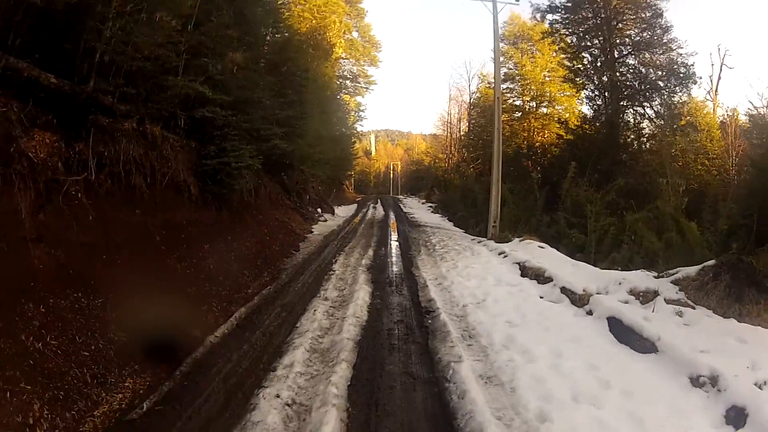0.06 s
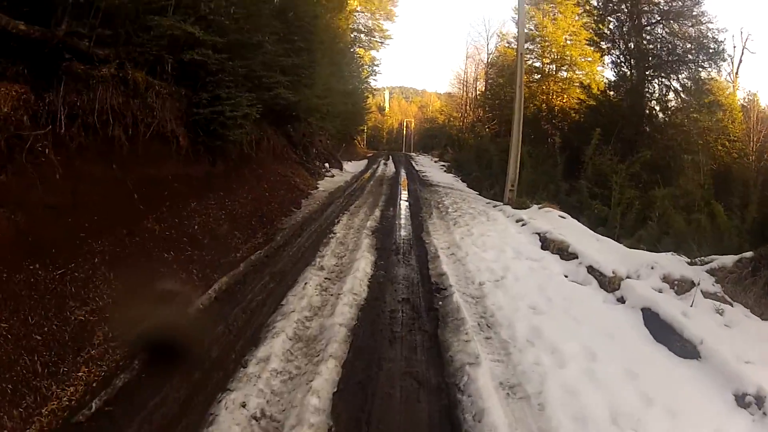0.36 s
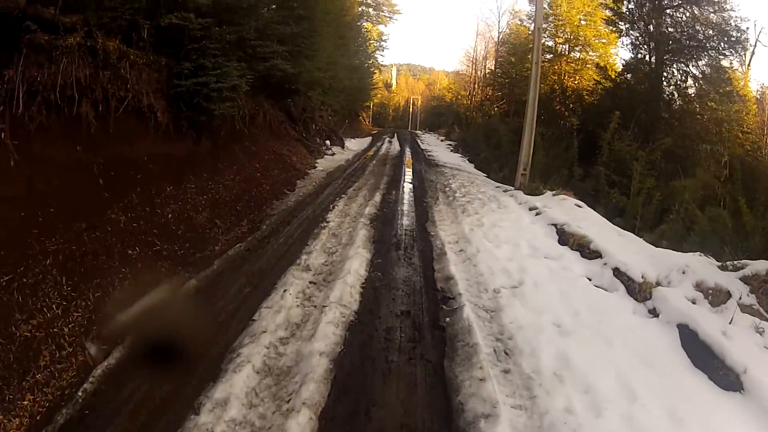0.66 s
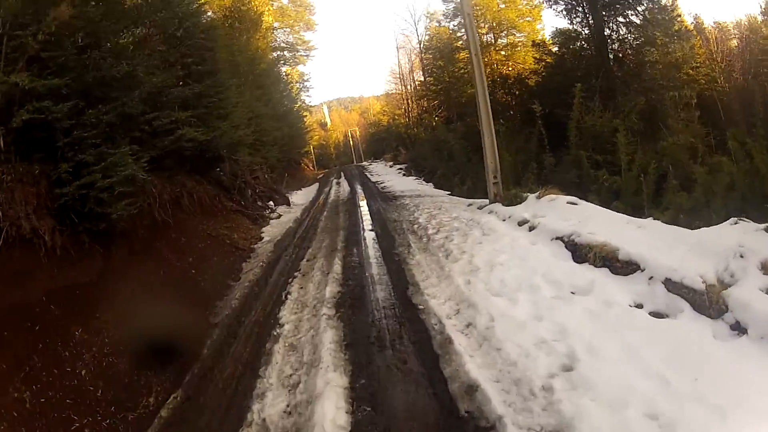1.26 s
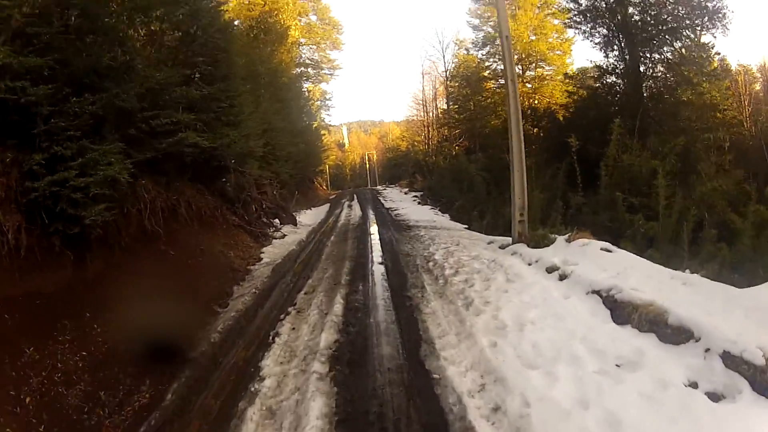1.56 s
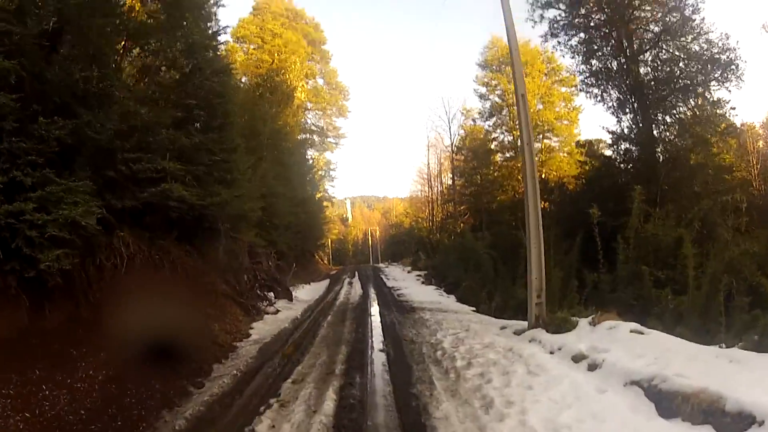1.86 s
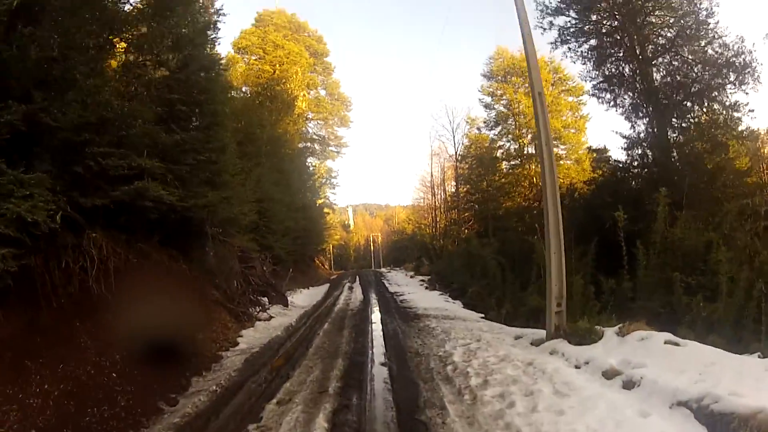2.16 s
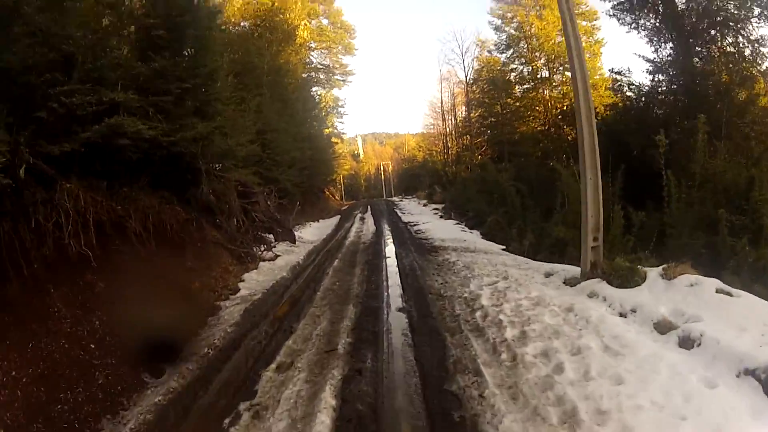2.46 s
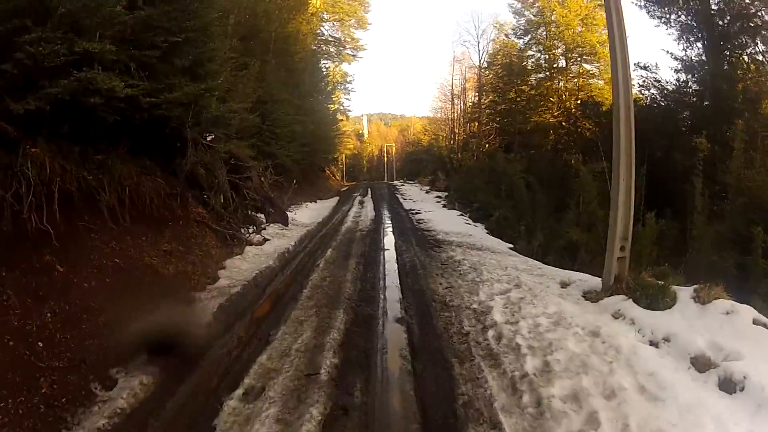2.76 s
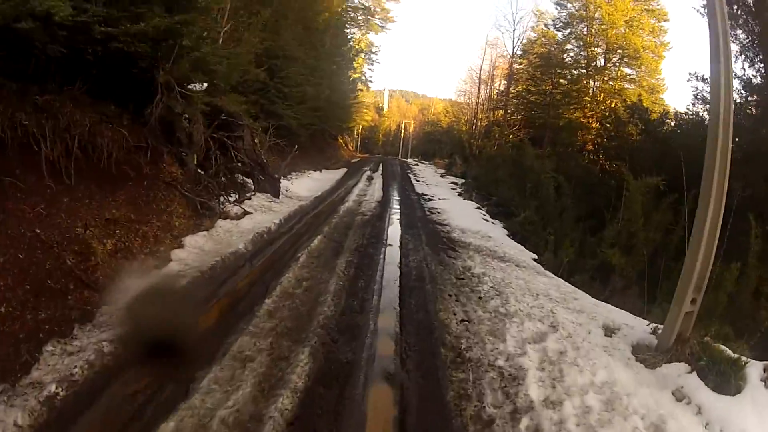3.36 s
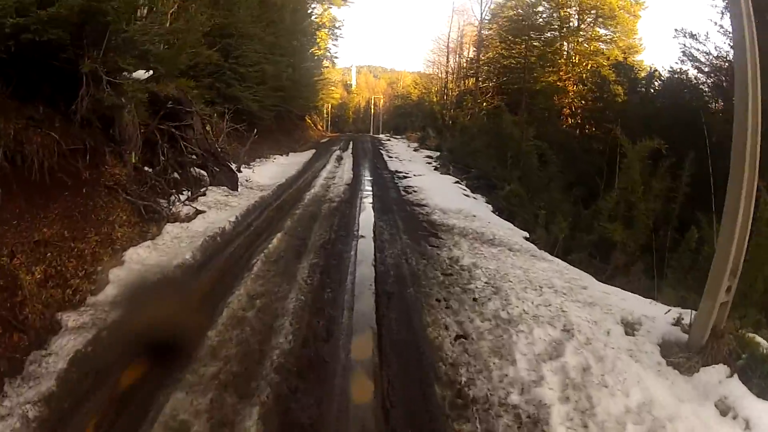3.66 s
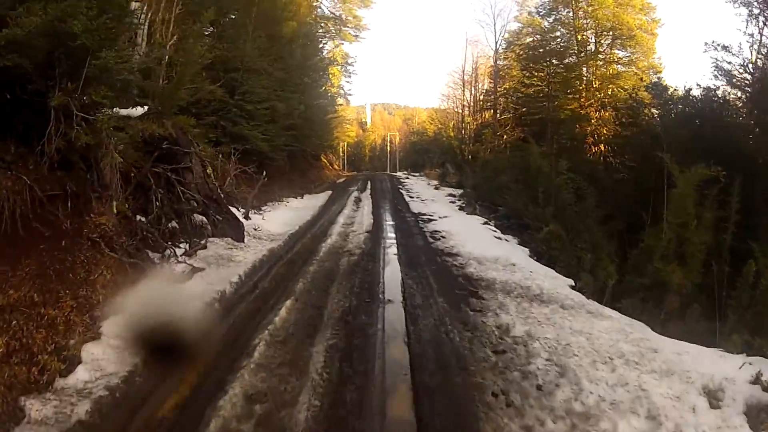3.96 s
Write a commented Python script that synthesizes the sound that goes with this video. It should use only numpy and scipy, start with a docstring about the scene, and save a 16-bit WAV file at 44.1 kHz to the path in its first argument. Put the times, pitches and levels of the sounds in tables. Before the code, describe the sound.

Wet slush hisses and spatters under bicycle tyres on a forest road, growing a little stronger midway. Deep wind buffeting, soft knocks and scattered rattling clicks run through it, heard close and boxy from a microphone travelling with the bike.

```python
"""Bicycle on a slushy forest track

Heard from a closed case that rides along. The tyres throw a fizzing spray and splash through wetter
patches, both coloured by the case's resonances. Grit or rattle ticks on the case, bumps rock the
mount and wind buffets it, over a bed of tyre roar and hiss."""
import sys
import numpy as np
from scipy import signal
from scipy.fft import rfft, irfft
from scipy.io import wavfile
from scipy.ndimage import uniform_filter1d

SR = 44100
rng = np.random.default_rng(int(sys.argv[2]) if len(sys.argv) > 2 else 0)


def log_audio(samples):
    """Write samples as a 16-bit WAV file to the path given in sys.argv[1]."""
    # one column per channel
    frames = np.atleast_2d(samples).T
    # limit to full scale, then quantise
    limited = np.clip(frames, -1, 1)
    pcm = np.round(limited * 32767).astype(np.int16)
    wavfile.write(sys.argv[1], SR, pcm)


N = 176400
TIME = np.arange(N) / SR

# Fader ride of the tyre spray. Each row: time in seconds, relative level in dB.
SPRAY_RIDE = [(0, -62), (.24, -61.5), (.45, -62), (.58, -64.5), (.64, -60), (.9, -61), (1.3, -61.5),
              (1.62, -57.5), (1.75, -60), (1.96, -57.5), (2.1, -59), (2.22, -55.5), (2.43, -57.5),
              (2.6, -57), (2.77, -59.5), (2.88, -57.5), (3.17, -58), (3.3, -60), (3.4, -67), (3.7, -64.5),
              (4, -60.5)]
# Resonances of the closed case. Each row: frequency in Hz, relative gain in dB.
CASE_EQ = [(200, -31.5), (600, -19.5), (950, -11.5), (1200, -2.5), (1400, -10), (1600, -11), (1820, 2.5),
           (2020, -3.5), (2170, -2), (2500, -1.5), (2930, -3.5), (3130, -1.5), (3400, -8), (3680, -4),
           (3980, -13), (4500, -13), (5130, -14.5), (5600, -18), (6020, -34), (6450, -18.5), (6900, -17),
           (7500, -18.5), (8000, -17), (8350, -11.5), (8600, -12), (9500, -12), (10250, -14), (10550, -29),
           (10850, -21.5), (11300, -41), (12800, -38), (13200, -28), (13500, -25), (13850, -15),
           (15200, -14.5)]
# Slush splashes. Each row: start in seconds, relative level in dB, fade in seconds, resonance in Hz.
SPLASH_CUES = [(0.212, -49.5, 0.011, 2400), (0.523, -52.5, 0.024, 2000), (0.753, -56, .025, 1870),
               (1.042, -49.5, 0.0067, 3220), (1.829, -55, 0.004, 6500), (1.855, -52.5, .014, 2500),
               (1.993, -49.5, 0.0098, 1310), (2.154, -48.5, 0.0081, 2300), (2.197, -45, 0.0051, 2300),
               (2.236, -55, .025, 2400), (2.5545, -40, 0.011, 1880), (2.573, -48, 0.005, 1900),
               (2.603, -59, .004, 5000), (2.627, -50, 0.01, 1820), (2.835, -51, 0.0079, 2200),
               (2.895, -50.5, 0.014, 2470), (3.13, -56, 0.02, 2500), (3.23, -57, 0.011, 2570),
               (3.952, -49, 0.0025, 3040)]
# Hard ticks, some in bouncing clusters. Each row: start in seconds, relative level in dB.
TICK_CUES = [(.3065, -49.5), (.3118, -52), (.3135, -56), (.3678, -57), (.852, -70), (.8668, -52),
             (.8941, -52), (.8986, -62), (.908, -56), (1.0417, -55), (1.5558, -51), (1.5885, -52),
             (1.6932, -49), (1.6957, -45.5), (1.7018, -48), (1.8295, -58), (1.9088, -55), (2.1262, -44),
             (2.1328, -45.5), (2.2969, -54), (2.3086, -53), (2.3152, -46.5), (2.3174, -49), (2.4432, -50.5),
             (2.5735, -51), (2.6058, -51), (3.2856, -60), (3.298, -55.5), (3.6468, -56), (3.8762, -42),
             (3.9167, -53.5)]
# The ring of a tick, two peaks round a notch. Each row: frequency in Hz, relative gain in dB.
TICK_EQ = [(1000, -25), (4000, -16), (4500, -20), (4750, 2), (5150, 4), (5600, -5.5), (6000, -19),
           (6450, -5), (6900, 1), (7300, -2), (7520, -27), (10000, -22), (15000, -42)]
# Bumps in the track. Each row: start in seconds, relative level in dB, rocking in Hz, decay in seconds.
BUMP_CUES = [(.35, -35.5, 29.5, 0.053), (0.594, -33.5, 30.3, 0.015), (.68, -37, 29.6, 0.0077),
             (0.838, -29.5, 30.9, 0.095), (1.311, -40, 31, 0.027), (1.627, -33.5, 27.3, 0.0083),
             (2.002, -28.5, 27.4, 0.0054), (2.28, -32, 25, 0.052), (2.555, -28, 28.5, 0.063),
             (2.999, -36, 32.4, .05), (3.11, -31, 36.4, 0.013), (3.169, -32, 26.6, 0.031),
             (3.848, -37.5, 29.2, 0.13)]
# The dull body of a bump. Each row: frequency in Hz, relative gain in dB.
THUD_EQ = [(30, -9.5), (70, 2.5), (120, -5), (250, -12.5), (500, -29), (2000, -58)]
# Fader ride of the wind. Each row: time in seconds, relative level in dB.
WIND_RIDE = [(0, -44.5), (.22, -44.5), (.5, -47), (.75, -43), (.95, -41.5), (1.1, -45.5), (1.25, -46),
             (1.35, -47.5), (1.5, -46.5), (1.75, -46), (1.95, -42.5), (2.08, -46.5), (2.25, -50.5),
             (2.4, -46), (2.7, -46.5), (3.0, -45.5), (3.28, -41.5), (3.38, -55.5), (3.5, -41.5),
             (3.78, -54.5), (4, -40)]
# Sub-heavy wind on the case. Each row: frequency in Hz, relative gain in dB.
WIND_EQ = [(8, -15), (20, 0), (30, 0), (42, -7), (60, -10), (85, -26.5), (130, -28), (300, -57),
           (1000, -82)]
# Low roar of the rolling tyres. Each row: frequency in Hz, relative gain in dB.
ROAR_EQ = [(30, -7), (100, 0), (170, 0), (250, 0.5), (400, -5.5), (700, -12), (1100, -18), (2500, -18.5),
           (8000, -78)]
# Hiss of air and far tyre noise. Each row: frequency in Hz, relative gain in dB.
HISS_EQ = [(500, -11), (1200, -10.5), (1500, -6.5), (1830, 9), (2200, -21.5), (3600, 5), (4100, -13),
           (5200, -21.5), (6000, -25), (6900, -12.5), (9500, -19.5), (12000, -16), (15000, -17.5)]
# Faint noise that widens the stereo image. Each row: frequency in Hz, relative gain in dB.
WIDTH_EQ = [(24, -51), (40, -32), (102, -4.5), (251, 4), (1500, -13), (1790, -44.5), (4650, -9),
            (6240, -28), (7220, -13.5), (8790, -31.5), (14000, -49)]


def spray():
    """Water and slush leave the tyres in a fluttering stream, heard through the case."""
    level = curve(SPRAY_RIDE) * amp(-0.5 + 0.56 * wander(3.5, 60))
    return colour(patchy(droplets(), depth_db=1.0) * level * clumps(), CASE_EQ)


def droplets(per_second=6000, spread_db=2.5, wash_share=0.49):
    """Dense tiny impacts of uneven size fizz over a smooth wash."""
    size = amp(spread_db * np.minimum(rng.exponential(1, N), 5))
    hits = size * rng.choice([-1, 1], N) * (rng.random(N) < per_second / SR)
    return np.sqrt(1 - wash_share) * unit(hits) + np.sqrt(wash_share) * rng.standard_normal(N)


def clumps(per_second=90, decay_s=0.0027, spread_db=3):
    """Gain on the spray: it leaps as each clump of slush bursts, then falls back."""
    power = amp(spread_db * np.minimum(rng.exponential(1, N), 2)) ** 2
    bursts = power * (rng.random(N) < per_second / SR)
    return np.sqrt(1 + signal.lfilter([1], [1, -np.exp(-1 / (decay_s * SR))], bursts))


def sizzle(ring_hz=2445, q=6.1):
    """Droplets ring the wet tyre, which sings out where the spray is strongest."""
    ride = curve(SPRAY_RIDE)
    level = amp(-63 + 2.5 * wander(3.5, 30)) * (ride / ride.max()) ** 2.75
    peak = signal.iirpeak(ring_hz, q, fs=SR)
    return level * unit(signal.lfilter(*peak, signal.lfilter(*peak, droplets())))


def splashes(attack_s=0.0005, crack_db=19, q=8.4, wet_gain=2.7):
    """Each wetter patch gives a crack and a short burst of droplets with a wet resonance."""
    track, drops, t = np.zeros(N), droplets(), TIME[:SR // 8]
    for k, (start, db, fade_s, hz) in enumerate(SPLASH_CUES):
        envelope = np.minimum(t / attack_s, 1) * np.exp(-(t / fade_s) ** 2 / 2)
        burst = envelope * drops[k * len(t):][:len(t)] + amp(crack_db) * (t == 0)
        wet = signal.lfilter(*signal.iirpeak(hz, q, fs=SR), burst)
        add(track, start, amp(db) * (burst + wet_gain * wet) / np.hypot(1, wet_gain))
    return colour(track, CASE_EQ)


def ticks(strays_per_second=14, tail_s=0.0034, tail_db=-6.5):
    """Hard impacts ring the case: faint random strays, and cued hits with a rattling tail."""
    hits = amp(-73 + 5.5 * rng.standard_normal(N)) * (rng.random(N) < strays_per_second / SR)
    t = TIME[:SR // 40]
    for start, db in TICK_CUES:
        tail = rng.standard_normal(len(t)) * np.exp(-t / tail_s) * np.minimum(2 * t / tail_s, 1)
        add(hits, start, amp(db) * ((t == 0) + amp(tail_db) * tail / np.linalg.norm(tail)))
    return amp(14.5) * colour(hits, TICK_EQ)


def bumps(attack_s=0.0085, overtone_db=-25.5):
    """Each bump rocks the mount in a dying low wobble and swells the tyre roar."""
    rocking, swell, t = np.zeros(N), np.zeros(N), TIME[:SR // 2]
    for start, db, hz, decay_s in BUMP_CUES:
        envelope = np.minimum(t / attack_s, 1) * np.exp(-np.maximum(t - 3 * attack_s, 0) / decay_s)
        phase = 2 * np.pi * hz * t
        wobble = np.sin(phase) + amp(overtone_db) * envelope * np.sin(2 * phase)
        add(rocking, start, amp(db) * envelope * wobble)
        add(swell, start, amp(db) * envelope ** 2)
    return rocking + amp(-34) * swell * noise(ROAR_EQ)


def thuds(delay_s=0.017, width_s=0.016):
    """A short dull knock as each bump reaches the case."""
    level = sum(amp(db) * np.exp(-((TIME - start - delay_s) / width_s) ** 2)
                for start, db, _, _ in BUMP_CUES)
    return amp(-21) * level * noise(THUD_EQ)


def wind():
    """Gusts buffet the case with a deep rumble."""
    return amp(-0.5) * curve(WIND_RIDE) * noise(WIND_EQ)


def tyre_roar():
    """The rolling tyres lay down a low, barely wavering bed."""
    return amp(-63.5 + 0.31 * wander(1, 16)) * noise(ROAR_EQ)


def hiss():
    """Air and far tyre noise blend into a steady hiss."""
    return amp(-72.5) * noise(HISS_EQ)


def amp(db):
    """Decibels to gain."""
    return 10 ** (np.asarray(db) / 20)


def unit(x):
    """Scales to rms 1."""
    return x / np.sqrt(np.mean(x ** 2) + 1e-20)


def curve(ride):
    """Gain over time from a fader ride."""
    return amp(np.interp(TIME, *np.transpose(ride)))


def add(track, start_s, sound):
    """Mixes a sound in at its cue."""
    part = track[max(round(start_s * SR), 0):][:len(sound)]
    part += sound[:len(part)]


def colour(x, eq):
    """Minimum-phase EQ of unit energy: the ring follows the hit."""
    eq_hz, eq_db = np.transpose(eq)
    hz = abs(np.fft.fftfreq(16384, 1 / SR))
    log_gain = np.log(amp(np.interp(np.log(hz + 1), np.log(eq_hz + 1), eq_db)))
    taps = np.fft.ifft(np.exp(np.conj(signal.hilbert(log_gain)))).real[:len(hz) // 2]
    return signal.fftconvolve(x, taps / np.linalg.norm(taps))[:N]


def noise(eq):
    """Noise of rms 1, shaped by an EQ."""
    return unit(colour(rng.standard_normal(N), eq))


def wander(low_hz, high_hz):
    """Random modulation of rms 1, mostly between two rates."""
    hz = np.fft.rfftfreq(N, 1 / SR)
    band = (hz > low_hz) / np.sqrt(hz + low_hz) / (1 + (hz / high_hz) ** 4)
    return unit(irfft(rfft(rng.standard_normal(N)) * band, N))


def patchy(x, depth_db, frame=512):
    """Lets narrow bands swell and fade at random."""
    bands = signal.stft(x, nperseg=frame)[2]
    swells = uniform_filter1d(rng.standard_normal(bands.shape), size=6, axis=0)  # smooth in frequency
    swells = unit(uniform_filter1d(swells, size=10, axis=1))  # and in time
    return unit(signal.istft(bands * amp(depth_db * swells), nperseg=frame)[1][:N])


def scene():
    """A nearly mono mix: only a trace of noise and of the ticks spreads to the sides."""
    roar, ticking = tyre_roar(), ticks()
    mid = spray() + sizzle() + splashes() + ticking + bumps() + wind() + thuds() + roar + hiss()
    side = amp(-82.5) * noise(WIDTH_EQ) + amp(-28) * signal.hilbert(ticking).imag
    return np.array([mid + side, mid - side])


def record(dry, whine_hz=12000, high_cut_hz=15350):
    """A faint high whine flickers with the low shaking; a steep high cut trims the top."""
    lows = signal.sosfilt(signal.butter(2, 100, fs=SR, output="sos"), dry)
    whine = amp(-44.5) * lows * np.sin(2 * np.pi * whine_hz * TIME)
    high_cut = signal.firwin(511, high_cut_hz, window=("kaiser", 9), fs=SR)
    return signal.oaconvolve(dry + whine, high_cut[None], "same")


dry = scene()
out = record(dry)
log_audio(out)
```